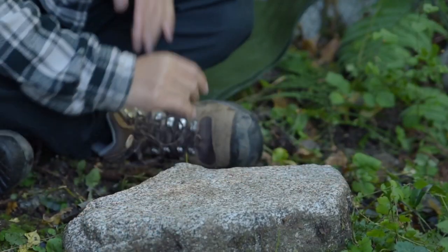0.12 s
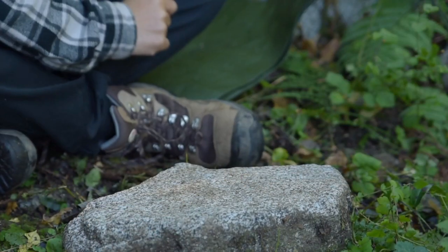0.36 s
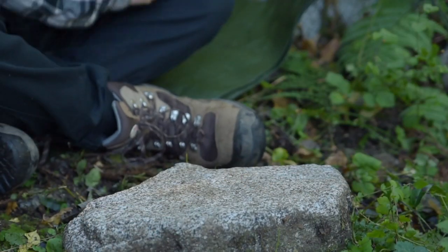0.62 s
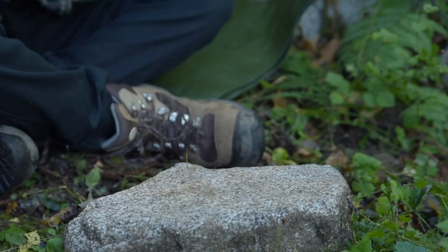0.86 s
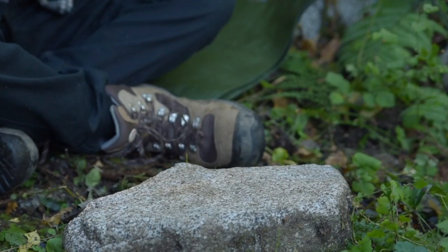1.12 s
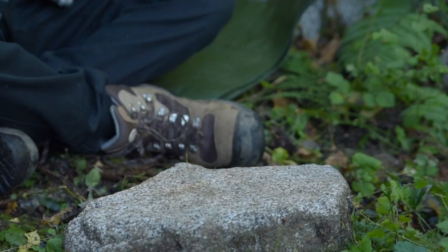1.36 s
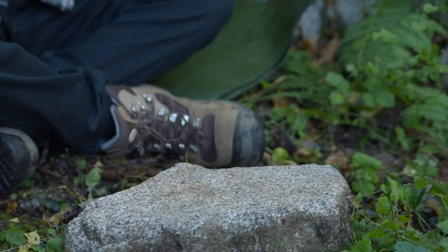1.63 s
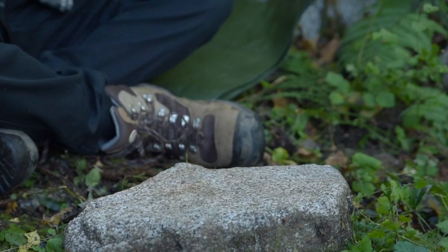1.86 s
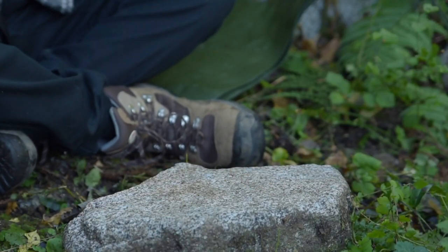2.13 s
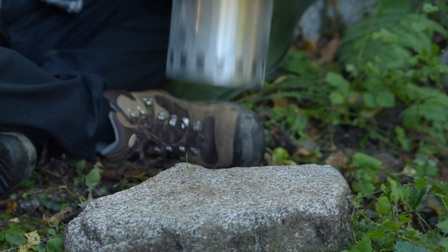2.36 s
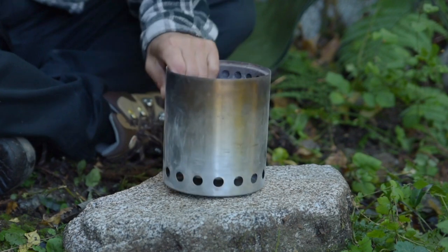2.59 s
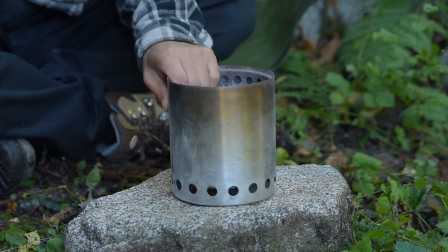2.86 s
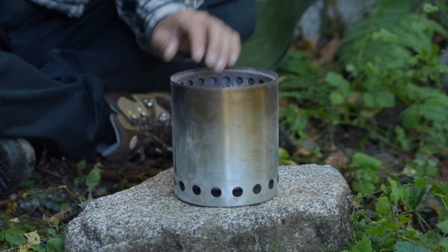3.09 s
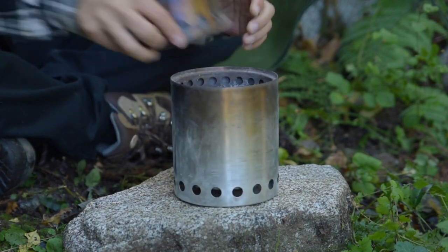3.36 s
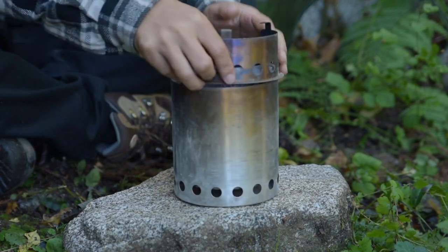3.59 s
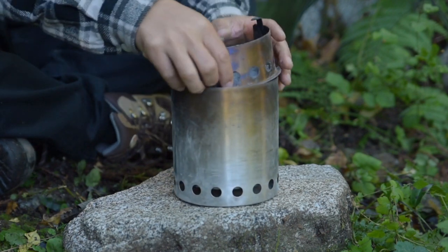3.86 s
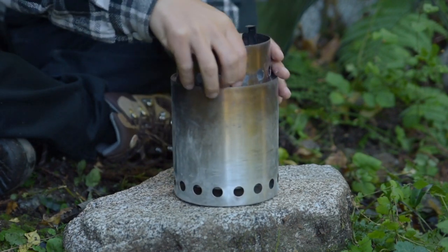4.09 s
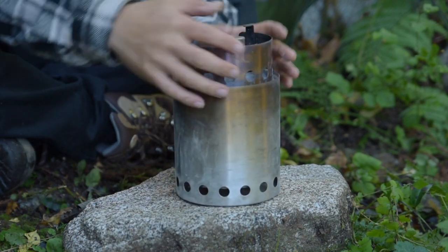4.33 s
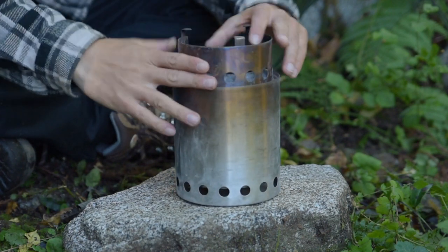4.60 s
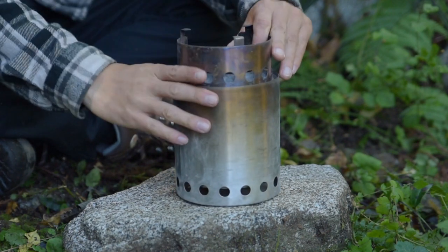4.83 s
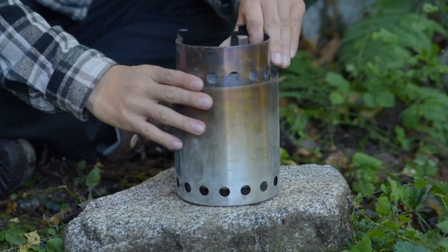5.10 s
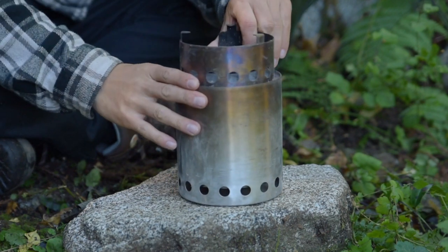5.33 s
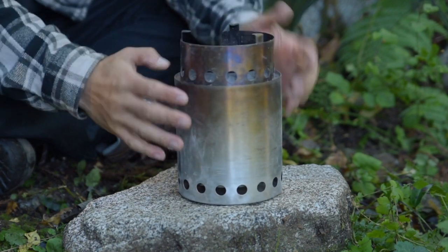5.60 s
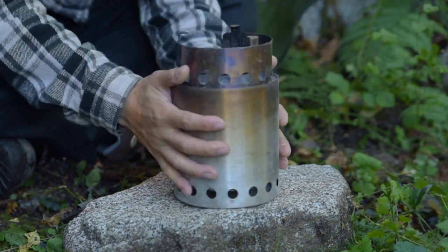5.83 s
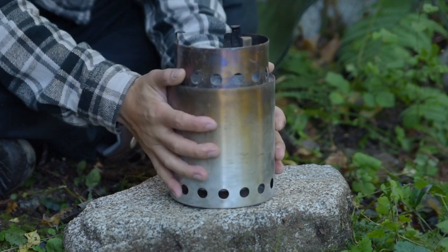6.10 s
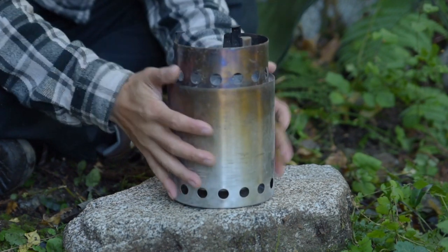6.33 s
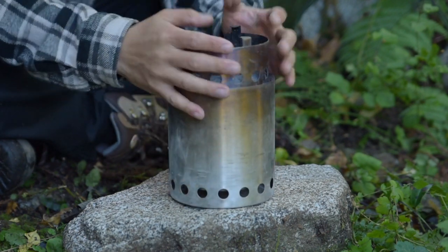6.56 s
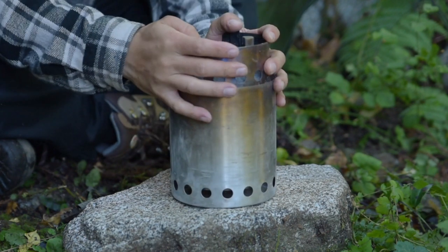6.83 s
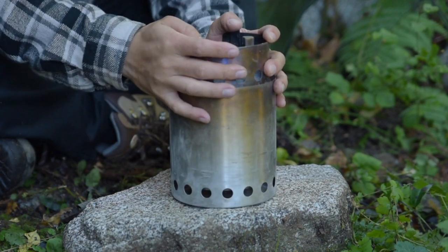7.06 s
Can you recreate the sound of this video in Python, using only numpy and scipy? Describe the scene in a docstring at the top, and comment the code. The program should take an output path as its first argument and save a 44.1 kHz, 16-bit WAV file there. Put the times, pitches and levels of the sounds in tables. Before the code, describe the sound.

A calm woodland bed of soft, smooth, distant leaf and air hiss lasts about 7 seconds, heard dry and close through one microphone. At 0-0.1 s hands brush in a faint high rustle; near 1.7 and 2.1 s come barely audible cloth ticks. At 2.59 s a thin steel stove hits rock with a loud, hollow, bright clank, then rocks to rest in weakening knocks and a gritty scrape until about 3.2 s. At 3.6 s a metal ring clinks onto it, scraping and clicking to 3.8 s, then is pressed home with firm clinks around 4.05-4.2 s. Soft rustles follow. From 5 to 5.3 s there are tiny ticks and light rubbing, a sharper clink at 5.4 s, and more knocks and scrapes from 5.8 to 6.15 s. A hand rustles at 6.35 s. Around 6.7-6.9 s a bird gives faint, high falling peeps amid slight rustling and a tiny metal tick.

```python
"""Out in the woods, one microphone: leaves and air, far off, hiss softly throughout as smooth drifting noise.
Hands and sleeves rustle now and then in puffs of high noise. A thin steel camp stove is set down on a rock
with a clank and rocks to rest; its pot ring is then dropped on, pressed home and turned, with clinks and
scrapes: gritty contact forces that ring the modes of the steel. Near the end a bird peeps faintly in thin
falling whistles."""
import sys
import numpy as np
from scipy import signal
from scipy.fft import rfft, irfft
from scipy.io import wavfile
from scipy.ndimage import uniform_filter1d

SR = 44100
rng = np.random.default_rng(int(sys.argv[2]) if len(sys.argv) > 2 else 0)


def rack_gain(trim_db):
    """Turn a fader trim in dB into the linear factor to multiply a signal by."""
    fader = np.asarray(trim_db, float)
    return 10 ** (fader / 20)


def int16_out(signal):
    """Quantize to a 16-bit WAV file."""
    q = np.round(np.clip(np.atleast_2d(signal).T, -1, 1) * 32767)
    wavfile.write(sys.argv[1], SR, q.astype(np.int16))


N = 317520  # samples

# Spectrum of the distant woods. Each row: frequency in Hz, relative density in dB per Hz.
WOODS_SPECTRUM = [(15, -55), (25, -42), (47, -15.5), (92, -6.5), (170, -0.5), (206, -2), (242, -1),
                  (416, -6.5), (516, -1), (1100, -1.5), (1400, -1.5), (1520, -4), (6740, -12.5),
                  (11900, -23.5), (16000, -31.5)]
WOODS_DB = -53  # rms

# Bird whistles. Each row: start in seconds, length in seconds, first pitch in Hz, last pitch in Hz,
# level in dB.
BIRD_PEEPS = [(6.678, 0.068, 7440, 7250, -65), (6.74, .035, 7250, 7100, -62),
              (6.805, 0.064, 7230, 7050, -65), (6.85, .04, 6800, 6650, -68)]

# Skin and cloth. Each row: middle in seconds, level at the peak in dB, length in seconds, lowest frequency in Hz.
RUSTLE_PUFFS = [(.03, -63, 0.069, 9800), (0.065, -57, 0.081, 4000), (1.66, -68, .03, 11000),
                (1.71, -65, 0.038, 10000), (1.76, -70, .03, 12000), (2.09, -72, .02, 11000),
                (4.484, -68, .09, 9000), (4.812, -68, 0.18, 9900), (5.078, -51, 0.012, 10000),
                (6.05, -73, .03, 10000), (6.345, -60, 0.11, 7950), (6.72, -66, 0.035, 9000),
                (6.766, -64, 0.043, 8000), (6.85, -63, .03, 8000)]

# Knocks of steel on rock or steel. Each row: start in seconds, peak level in dB, hardness in dB,
# main mode level in dB, time the contact takes to land in seconds.
STEEL_KNOCKS = [(2.5869, -4.5, -1.5, 4, .001), (2.614, -12.5, -2, 1, 0.0029), (2.7117, -14.5, -2, -8, .006),
                (2.7945, -20.5, -1, 4, 0.0037), (2.8568, -22, -3.5, -2, 0.0034),
                (2.953, -25.5, -1.5, -8, 0.0025), (3.6028, -15, -2.5, 6.5, 0.0022),
                (3.6203, -22.5, 2.5, 2, 0.0053), (3.731, -21, -4, -10, 0.00079),
                (3.7584, -23.5, 1, 4, 0.0049), (3.7795, -21.5, -0.5, 0, 0.0024),
                (3.9684, -39, 3, -11, .003), (3.9972, -32.5, -18, -7, 0.0036),
                (4.0417, -25, 0, -10, 0.0036), (4.0641, -15, -0.5, -1.5, 0.0012),
                (4.139, -25, -10, 5, 0.0044), (4.1789, -22.5, -3.5, 7.5, 0.0013), (4.9902, -40, 1, 0, .002),
                (5.0744, -37.5, 1, 0, .001), (5.141, -37.5, 5, 2, 0.0024), (5.2203, -35.5, 2, -9, 0.0025),
                (5.2948, -42.5, 8.5, -8, 0.0033), (5.4012, -21.5, -1, 0, 0.0064),
                (5.4286, -31.5, -14, 3, .005), (5.5093, -38, -6, -8, .003), (5.54, -37, -6, -5, .004),
                (5.8353, -30, -3, -4, .006), (5.8758, -32, -13, -3, 0.0068), (5.9226, -22.5, -3, 3, 0.0045),
                (5.98, -36.5, -6, 15.5, 0.0021), (6.116, -36.5, -9, -2, .003),
                (6.14, -34.5, -1, -4, 0.0018), (6.774, -39.5, -3, 5, 0.0018)]
CONTACT_S = 0.0091  # decay of the gritty part of a knock
CLEAN_BLOW_S = 0.00093  # contacts this quick are mostly one clean blow
CHATTER_DB, CHATTER_FADE_DB_PER_S = -17.5, -140  # loose steel chatters on after each knock

# Scrapes, whose pressure swells and eases. Each row: start in seconds, length in seconds, peak level in dB,
# hardness in dB, share of the length that swells.
STEEL_SCRAPES = [(2.70, 0.28, -30.5, -3.5, 0.36), (2.939, 0.29, -44.5, -5, .1),
                 (3.697, 0.17, -32.5, -4, 0.4), (3.944, 0.12, -41.5, -3, 0.52),
                 (4.099, 0.26, -39.5, -8, 0.25), (4.98, 0.5, -48.5, 1, 0.69),
                 (5.438, 0.22, -46.5, -12, 0.52), (5.741, 0.24, -41, 1.5, 0.59),
                 (5.973, 0.29, -55, -10, .2)]
SCRAPE_ENDS_DB = -18.5  # pressure at both ends, against the peak

# Force colour: a hard contact gains treble and loses bass; scrapes and chatter share the rub levels.
KNOCK_BASS_DB, BASS_PER_HARDNESS, TREBLE_DB = 1.5, -0.64, 0
RUB_BASS_DB, RUB_MAIN_DB = -1.5, 2
GRIT_PER_S = 6000  # mean rate of tiny clicks

# Families of close modes of the bare stove, with the ring on, and gripped while the ring is turned.
# Each row: frequency in Hz, spread in Hz, relative energy of the whole ring in dB.
BARE_MODES = [(361, 33, -17), (588, 32, -11.5), (779, 27, -17), (1010, 22, -13), (1384, 22, -2),
              (1549, 61, -1.5), (1940, 24, -6.5), (2190, 78, -6), (2474, 23, -16), (2690, 49, -13),
              (2900, 81, -10), (3194, 55, -12.5), (3690, 44, -24), (3830, 21, -12.5), (4100, 97, -14),
              (4450, 48, -8.5), (4677, 18, -15.5), (4950, 27, -7), (5600, 39, -20), (5780, 65, -26),
              (6160, 31, -20), (6330, 50, -17), (7280, 140, -17), (8300, 77, -17), (8260, 83, -16),
              (9170, 19, -34), (9400, 44, -24), (9660, 67, -31)]
RING_ON_MODES = [(339, 52, -23), (565.4, 73, -15), (1155, 29, -12), (1380, 50, 0), (1605, 33, -9),
                 (1954, 35, -7.5), (2125, 48, -10), (2716, 61, -16), (3007, 87, -6), (3320, 70, -8),
                 (3870, 32, -19.5), (4080, 116, -11), (4430, 71, -8), (4830, 230, -25), (5480, 59, -18),
                 (6400, 68, -13), (7300, 130, -14), (7640, 39, -18), (8040, 34, -24), (8380, 67, -17),
                 (8950, 34, -22), (9800, 81, -24)]
GRIPPED_MODES = [(346, 39, -12), (564, 63, -11.5), (1395, 99, -2), (1590, 40, -1.5), (1970, 24, -9.5),
                 (2137, 70, -7.5), (2620, 35, -16), (2980, 130, -3.5), (3307, 29, -9.5), (3820, 38, -18),
                 (4160, 59, -8.5), (4390, 56, -14), (4770, 63, -23), (4870, 69, -19), (5700, 91, -17),
                 (6410, 45, -17), (6770, 71, -14), (7200, 80, -14), (8370, 66, -14), (9730, 65, -23)]
RING_ON_S, GRIPPED_S = 3.3, 4.6

# Ringing of those modes. Each row: frequency in Hz, time to fall by 60 dB in seconds.
MODE_T60 = [(300, 0.15), (600, 0.24), (1000, 0.39), (1400, 0.11), (2000, 0.28), (3000, 0.052), (4100, 0.37),
            (5000, 0.13), (7000, 0.13), (10000, 0.31)]

# Spectrum of the countless small modes of the sheet. Each row: frequency in Hz, relative density in dB per Hz.
SHEET_SPECTRUM = [(100, -39), (250, -14.5), (450, -18.5), (750, -15), (1100, -24), (1500, -3),
                  (2300, -12.5), (3000, -11), (3600, -17), (4600, -14), (5800, -21), (8300, -13),
                  (9300, -21), (10300, -27.5), (12500, -18.5), (16000, -36.5)]

# Ringing of the small modes. Each row: frequency in Hz, time to fall by 60 dB in seconds.
SHEET_T60 = [(150, 0.07), (500, 0.027), (1500, 0.043), (4000, 0.065), (8000, 0.053), (14000, 0.035)]
SHEET_DB = 2  # small modes over clear ones


def evened(x):
    """Scales to rms 1."""
    return x / np.sqrt(np.mean(x ** 2) + 1e-20)


def read(points, hz):
    """Reads a table on a log-frequency axis."""
    f, value = np.transpose(points)
    return np.interp(np.log(hz + 1), np.log(f + 1), value)


def add(mix, s, sound):
    """Mixes a sound in at time s, in seconds."""
    part = mix[..., max(round(s * SR), 0):][..., :sound.shape[-1]]
    part += sound[..., :part.shape[-1]]


def noise(length, field_db, size):
    """Random short-time spectra shaped to field_db(hz, t) in dB, then scaled to rms 1."""
    hz = np.fft.rfftfreq(size, 1 / SR)[:, None]
    t = np.arange(4 * length // size + 5) * size / 4 / SR
    real, imaginary = rng.standard_normal((len(t), len(hz), 2)).T
    spectra = (real + 1j * imaginary) * rack_gain(field_db(hz, t))
    sound = signal.istft(spectra, nperseg=size, noverlap=3 * size // 4)[1]
    return evened(sound[:length])


def grit(length, spread_db=2.5):
    """Rough surfaces touch in many tiny clicks of uneven size and random sign."""
    touch, size, sign = rng.random((length, 3)).T
    touches = touch < GRIT_PER_S / SR
    sizes = rack_gain(-spread_db * np.log(size + 1e-2))
    return evened(touches * sizes * np.sign(sign - .5))


def woods(patchy_db=.6, swell_db=.25):
    """Distant leaves and air: smooth noise with faint drifting patches and a slow swell."""
    def field_db(hz, t):
        """Level over frequency and time: the spectrum, the patches and the swell."""
        patches = rng.standard_normal((len(t), len(hz))).T
        patches = uniform_filter1d(patches, size=20, axis=0)
        patches = evened(uniform_filter1d(patches, size=30, axis=1))
        rates_hz = np.geomspace(.2, 3, 20)
        swell = evened(sum(np.sin(2 * np.pi * (f * t + rng.random())) / np.sqrt(f) for f in rates_hz))
        return read(WOODS_SPECTRUM, hz) + patchy_db * patches + swell_db * swell
    return rack_gain(WOODS_DB) * noise(N, field_db, size=2048)


def bird():
    """Thin falling whistles, each a gliding sine that flutters in level."""
    out = np.zeros(N)
    for s, length, start_hz, end_hz, db in BIRD_PEEPS:
        n = round(length * SR)
        turns = np.cumsum(np.linspace(start_hz, end_hz, n)) / SR
        whistle = np.sqrt(2) * np.sin(2 * np.pi * turns)
        flutter = 1 + 0.52 * np.sin(2 * np.pi * (55 * np.arange(n) / SR + rng.random()))  # 55 Hz
        add(out, s, rack_gain(db) * whistle * flutter * signal.windows.tukey(n, .5))
    return out


def rustles():
    """Skin and cloth rub in soft puffs of high, slightly grainy noise."""
    out = np.zeros(N)
    for s, db, length, low_hz in RUSTLE_PUFFS:
        n = round(length * SR)
        rub = rng.standard_normal(SR // 3) + .5 * grit(SR // 3)
        band = signal.butter(2, [low_hz, 14500], "band", fs=SR, output="sos")
        high = evened(signal.sosfilt(band, rub))
        add(out, s - n / SR / 2, rack_gain(db) * high[:n] * np.hanning(n))
    return out


def colour(db, hardness_db, main_db, bass_db):
    """Gains of the four force rows: bass, main mode, rest, treble."""
    bass = bass_db + BASS_PER_HARDNESS * hardness_db
    treble = TREBLE_DB + hardness_db
    return rack_gain(db + np.array([[bass], [main_db], [0], [treble]]))


def knocks(force, click_peak):
    """Adds knocks: a clean blow, a short gritty burst as the contact lands, then fading chatter."""
    t = np.arange(SR // 4) / SR
    for s, db, hardness_db, main_db, landing in STEEL_KNOCKS:
        rise = np.minimum(t / landing, 1)
        burst = grit(len(t)) * rise * np.exp(-np.maximum(t - landing, 0) / CONTACT_S)
        burst /= np.linalg.norm(burst) + 1e-9
        burst[0] = CLEAN_BLOW_S / landing
        burst /= np.linalg.norm(burst) * click_peak
        add(force, s, colour(db, hardness_db, main_db, KNOCK_BASS_DB) * burst)
        chatter = grit(len(t)) * rack_gain(CHATTER_DB + CHATTER_FADE_DB_PER_S * t) * rise
        add(force, s, colour(db, hardness_db, RUB_MAIN_DB, RUB_BASS_DB) * chatter)


def scrapes(force):
    """Adds scrapes: lasting grit under a pressure that swells and eases."""
    for s, length, db, hardness_db, swell in STEEL_SCRAPES:
        n = round(length * SR)
        pressure_db = np.interp(np.arange(n) / n, [0, swell, 1], [SCRAPE_ENDS_DB, 0, SCRAPE_ENDS_DB])
        rub = grit(SR * 3 // 5)[:n] * rack_gain(pressure_db) * signal.windows.tukey(n, .1)
        add(force, s, colour(db, hardness_db, RUB_MAIN_DB, RUB_BASS_DB) * rub)


def steel(families):
    """Answer of the steel to one click, energy 1: three close modes a family over a thicket of small ones."""
    t = np.arange(SR * 3 // 4) / SR
    clear = np.zeros(len(t))
    for (hz, spread, db), phase in zip(families, rng.random(len(families))):
        t60 = read(MODE_T60, hz)
        turns = np.outer(t, hz + spread * np.array([0, -.35, .5])) + phase + [0, .25, .25]
        trio = np.sin(2 * np.pi * turns) @ [1, .5, .5]
        clear += rack_gain(db - 60 * t / t60) * trio / np.sqrt(t60)  # dB counts the energy of the whole ring

    def fading_db(hz, t):
        """Decay of the small modes."""
        return -60 * t / read(SHEET_T60, hz)

    thicket = rfft(noise(len(t), fading_db, size=256))
    # modes lie evenly: no band is favoured
    thicket /= np.sqrt(uniform_filter1d(np.abs(thicket) ** 2, size=120))
    thicket *= rack_gain(read(SHEET_SPECTRUM, np.fft.rfftfreq(len(t), 1 / SR)))
    thicket = irfft(thicket, len(t))
    both = evened(clear) + rack_gain(SHEET_DB) * evened(thicket)
    both *= np.minimum(t / 0.00059, 1)  # onset in seconds
    both *= np.clip(2 - 3 * t / t[-1], 0, 1)  # fades to silence before the end
    return both / np.linalg.norm(both)


def stove(thud_hz=110, bass_hz=900, main_hz=1410, main_width=90, treble_hz=6000):
    """The force rings the bare stove first, then stove and ring together, then both in the grip of two hands."""
    bodies = np.array([steel(BARE_MODES), steel(RING_ON_MODES), steel(GRIPPED_MODES)])
    rows = np.zeros((4, N))  # contact force: bass, main mode, rest, treble
    knocks(rows, click_peak=np.abs(bodies).max(1).mean())
    scrapes(rows)
    hz = np.fft.rfftfreq(N, 1 / SR) + 1
    bass = 1 / (1 + (hz / bass_hz) ** 6)
    treble = 1 / (1 + (treble_hz / hz) ** 6)
    # where the steel is touched sets how well this mode speaks
    main = 1 / (1 + ((hz - main_hz) / main_width) ** 4)
    thud_cut = 1 + (thud_hz / hz) ** 4
    bands = np.array([bass / thud_cut, main, 1 - bass - main - treble, treble])
    force = irfft((rfft(rows) * bands).sum(0), N)
    body_now = np.searchsorted([RING_ON_S, GRIPPED_S], np.arange(N) / SR)
    stage = body_now == np.arange(len(bodies))[:, None]
    return signal.fftconvolve(force * stage, bodies, axes=1).sum(0)[:N]


def scene():
    """The stove, rustling hands, bird and far woods, summed at one microphone."""
    return (stove() + rustles() + bird() + woods())[None]


def band_limit(x):
    """A steep low-pass at the top of the band."""
    return signal.sosfilt(signal.butter(12, 16480, fs=SR, output="sos"), x)


def record(dry):
    """Takes down the finished mix from the one microphone."""
    return band_limit(dry)


dry = scene()
out = record(dry)
int16_out(out)
```